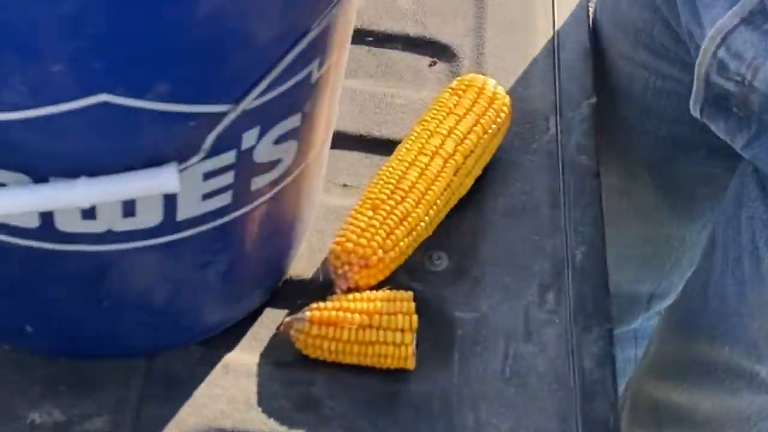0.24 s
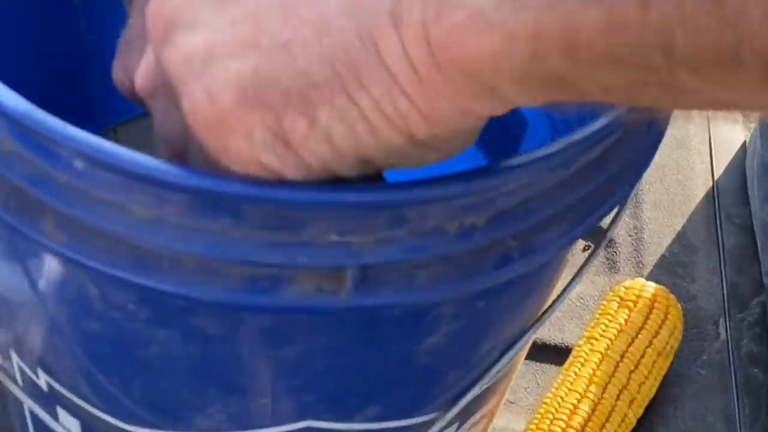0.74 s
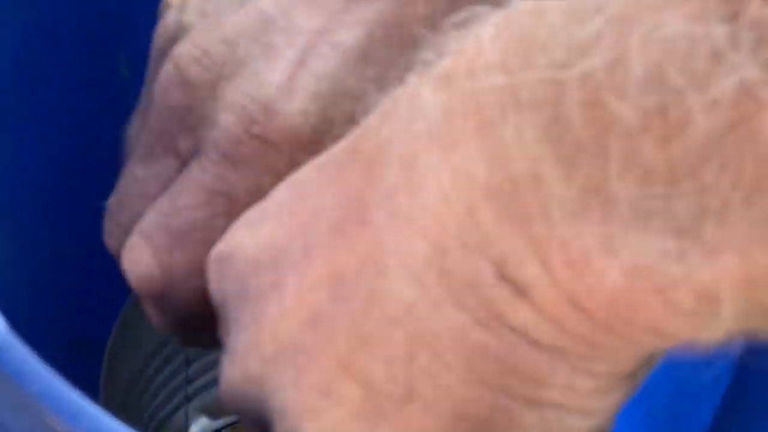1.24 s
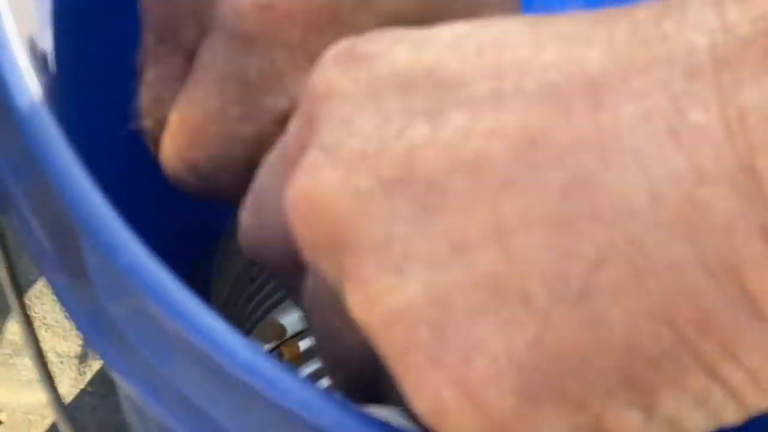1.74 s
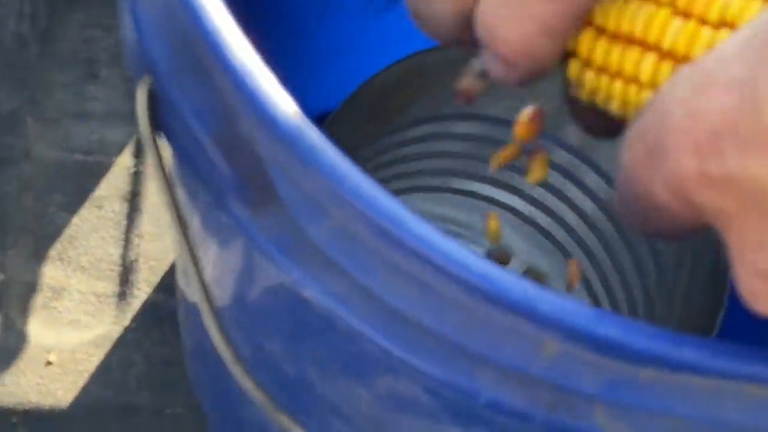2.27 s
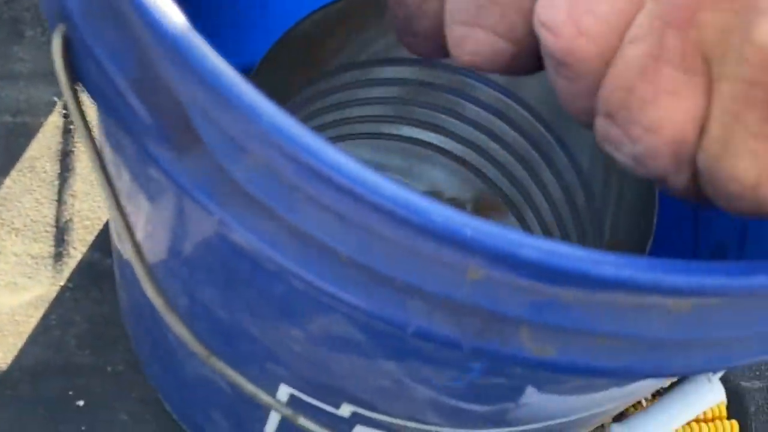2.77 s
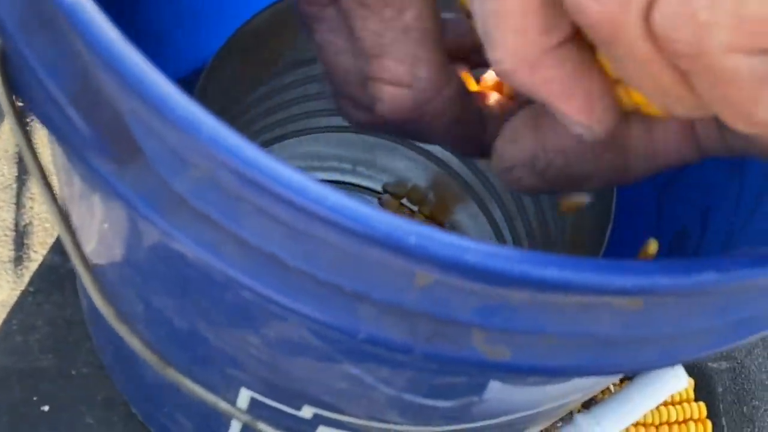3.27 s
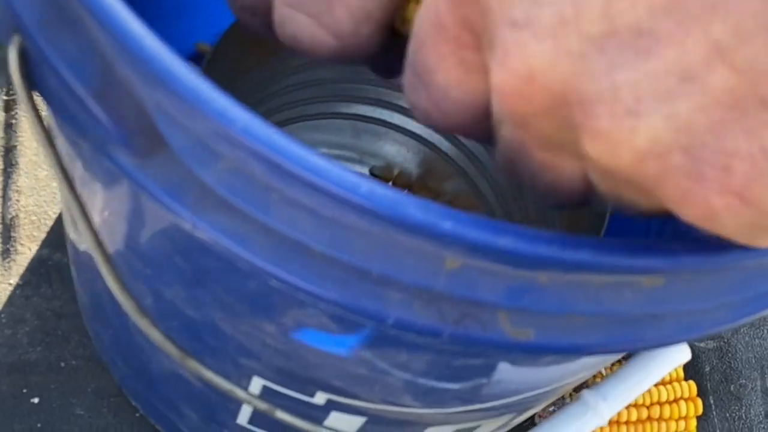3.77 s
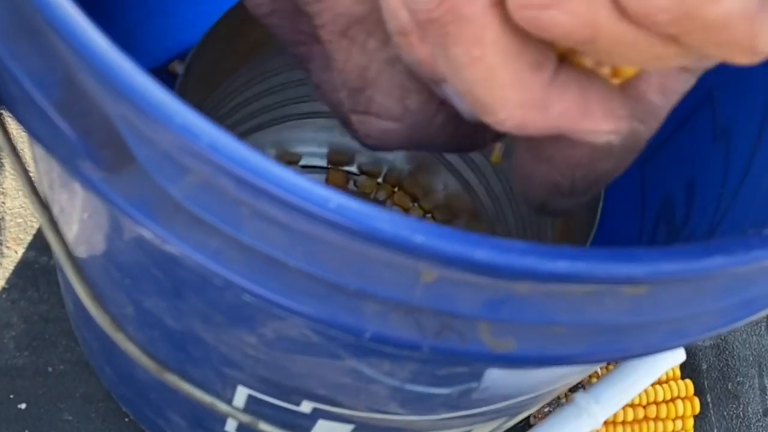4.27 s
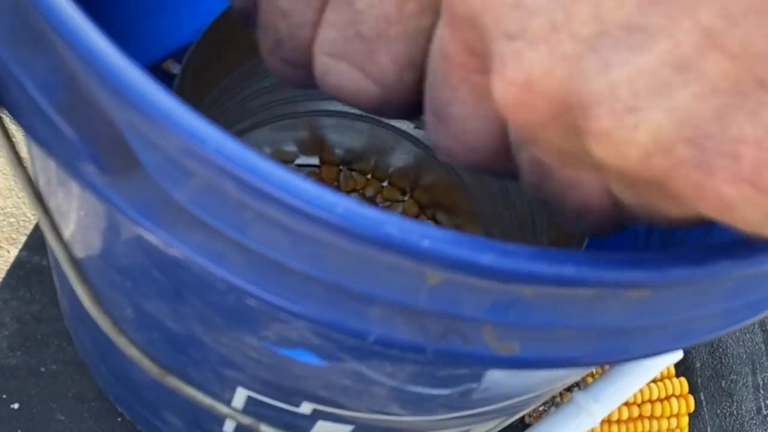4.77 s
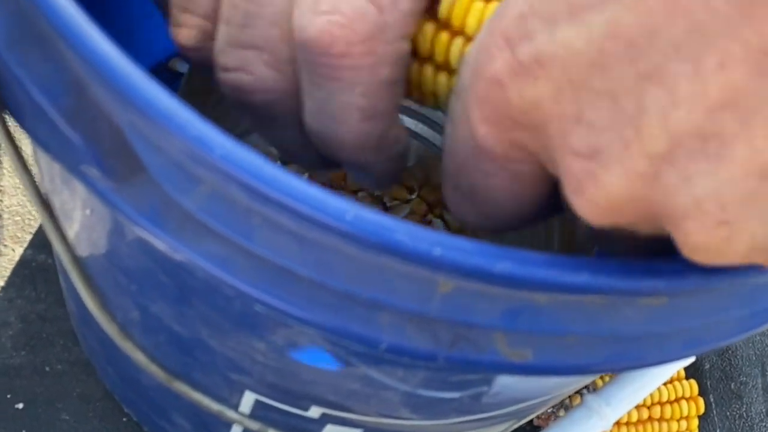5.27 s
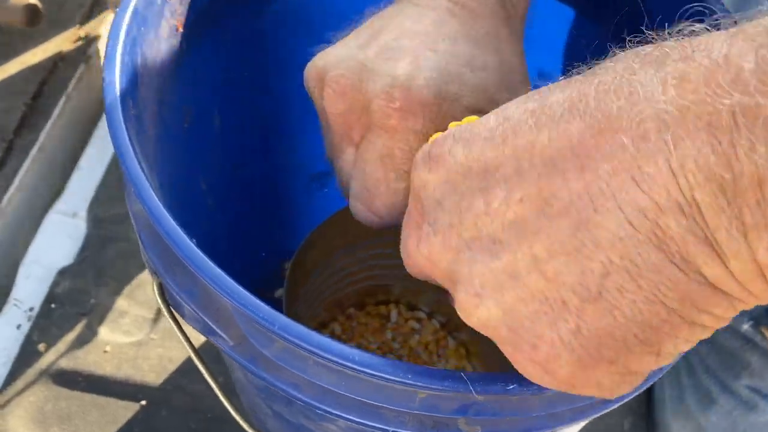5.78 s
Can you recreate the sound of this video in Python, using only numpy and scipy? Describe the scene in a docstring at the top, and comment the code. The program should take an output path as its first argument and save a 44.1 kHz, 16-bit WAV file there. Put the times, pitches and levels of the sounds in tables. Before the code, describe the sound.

Outdoors, hard kernels rattle and ping into a tin can in a plastic bucket, with faint bird whistles and a late, fading engine rumble.

```python
"""Corn kernels into a tin can

Dry kernels are twisted off a cob and clatter into a tin can in a plastic bucket outdoors: struck modes plus
streaked noise. The bucket booms (struck air and wall modes), hands rustle (grainy noise), a far bird whistles
(sliding sines). After a cut to a second view a nearby idling engine (throbbing noise, two tones) fades
while a few more kernels drop into the fuller can.
"""
import sys
import numpy as np
from scipy import signal
from scipy.fft import rfft, irfft, next_fast_len
from scipy.io import wavfile
from scipy.ndimage import uniform_filter1d, map_coordinates

SR = 44100
rng = np.random.default_rng(int(sys.argv[2]) if len(sys.argv) > 2 else 0)


def log_audio(samples):
    """Write samples as a 16-bit WAV file to the path given in sys.argv[1]."""
    # one column per channel
    frames = np.atleast_2d(samples).T
    # limit to full scale, then quantise
    limited = np.clip(frames, -1, 1)
    pcm = np.round(limited * 32767).astype(np.int16)
    wavfile.write(sys.argv[1], SR, pcm)


N = 265217
T = np.arange(N) / SR  # s
CUT_S = 5.388  # start of the second view

# Outdoor air spectrum: freq_hz, relative_db_per_hz
AIR_SPECTRUM = [(15, -31.5), (45, -3.5), (301, -13), (1200, -20), (2990, -28.5), (4030, -22.5),
                (7110, -35.5), (16000, -40.5)]
# Wind on the microphone ports: start_s, hold_s, level_db
PUFFS = [(0.0, .04, -42), (1, 0.056, -68), (5.3, .08, -74)]
# Engine noise spectrum: freq_hz, relative_db_per_hz
ENGINE_SPECTRUM = [(25, -16), (60, 10), (120, -4), (250, -13.5), (600, -17.5), (2000, -22), (5000, -22.5),
                   (9000, -29.5), (13000, -30), (16000, -29)]
# Engine tones: freq_hz, peak_db before wobble
ENGINE_TONES = [(140.0, -64), (479.1, -51.5)]
AIR_DB = -73.5
PUFF_RISE_DB_S, PUFF_FALL_DB_S = 310, 81
ENGINE_DB, ENGINE_FADE_DB_S = -37.5, 12

# Whistle arches: start_s, length_s, top_hz, top_position (share of length), relative_level_db
WHISTLES = [(.3, .21, 4500, .6, -76), (.53, .07, 4080, .5, -82), (.66, .16, 4230, .25, -79),
            (1.12, .17, 4330, .35, -81), (1.96, .06, 4100, .15, -72), (2.087, .053, 4250, .55, -60),
            (2.195, .05, 4410, .45, -68), (2.257, .06, 4280, .6, -66), (3.07, .13, 4270, .35, -79),
            (4.78, .08, 4550, .3, -82), (5.54, .035, 4250, .55, -53), (5.58, .045, 4060, .1, -56)]
START_DROP, END_DROP, BEND = 0.09, 0.17, 1.5  # depth below top (shares of top_hz), curve exponent
FULL_DEPTH_S = .16  # depth scales as sqrt(length / this)

# Hands and cob rubbing: start_s, hold_s, scrape_db, hiss_over_scrape_db
RUBS = [(0.0, 0.056, -29.5, -12), (.095, 0.042, -41, -8), (.22, 0.43, -66.5, -7.5), (.88, .19, -65, -7),
        (.925, .03, -64, 1), (.985, .01, -66, 3), (1.035, .006, -69, 2), (1.27, 0.11, -68.5, -2.5),
        (1.95, 0.14, -75, 3.5), (3.0, 0.021, -76, -4.5), (4.72, 0.081, -74.5, -14),
        (4.87, 0.047, -73.5, 8.5)]
# Hiss spectrum: freq_hz, relative_db_per_hz
HISS_SPECTRUM = [(300, -120), (1500, -26), (3000, 1.5), (6000, 0.5), (10000, -7), (14000, -4),
                 (16000, -19.5)]
# Scrape spectrum: freq_hz, relative_db_per_hz
SCRAPE_SPECTRUM = [(90, -21.5), (200, 9), (500, -1), (1500, 0), (2500, -10), (5000, -51.5)]
RUB_RISE_DB_S, RUB_FALL_DB_S = 712, 331.5

# Touches on the bucket: start_s, relative_level_db, knock_over_level_db
TOUCHES = [(0.003, -7.5, -1.5), (0.021, -20, 10), (0.058, -12, -3), (0.093, -31, 5), (0.218, -24, 5),
           (0.245, -25.5, 4.5), (0.271, -26.5, -1), (0.306, -26.5, -16), (0.365, -22.5, -5.5),
           (0.391, -38, 15.5), (1.003, -37.5, 0), (1.133, -51.5, 18.5), (1.397, -23.5, -24),
           (1.54, -32, 15), (1.626, -21.5, -3), (1.681, -38, 13), (1.737, -31.5, -6), (2.56, -34, 0),
           (3.268, -41, -21.5), (3.292, -36, -41.5), (3.436, -37.5, 12.5), (3.546, -40, 3), (3.745, -29, 1),
           (3.769, -34, 8), (3.79, -23, -3), (3.809, -32.5, -20), (4.221, -27, 0), (4.404, -49, 22.5),
           (4.569, -50.5, 23), (4.769, -37, -26.5), (4.788, -34.5, -20.5), (5.011, -50.5, 0),
           (5.114, -38.5, -3), (5.327, -31, 3), (5.86, -24.5, 10), (5.972, -32, -1)]
# Air and wall modes of the bucket: freq_hz, width_hz, relative_db
BUCKET_MODES = [(145, 17, -1), (175, 31, 5), (209.7, 19, 6), (300, 33, -4.5)]
# Wall knock spectrum: freq_hz, relative_db_per_hz
KNOCK_SPECTRUM = [(130, -45), (250, -7), (450, 5), (900, 1), (1350, -7), (1800, -30.5), (4000, -49)]
# Shoves that keep the bucket booming: start_s, hold_s, level_db before the push filter
SHOVES = [(0.0, 0.074, -27), (.3, 0.023, -34), (.95, 0.2, -58.5), (1.6, 0.061, -34.5), (2.5, 0.11, -46.5),
          (3.3, 0.26, -54), (3.8, 0.59, -50), (4.8, 0.42, -63.5)]
# Can rattling in the shoved bucket: start_s, hold_s, level_db
SHAKES = [(0, .11, -40)]
SHOVE_RISE_DB_S, SHOVE_FALL_DB_S = 290.5, 96
BOOM_DB, KNOCK_DB = -6.5, -13  # response to a touch

# Kernels on the can bottom: start_s, relative_level_db, body_over_level_db, gong_db, treble_over_level_db,
# best_low_mode_hz, best_high_mode_hz
KERNELS = [(1.34, -40, 1.5, -47.0, -7.5, 1030, 2645), (1.355, -11.5, -2.9, -38.0, -10.5, 1030, 4325),
           (1.375, 1.5, -3.5, -22.5, -4, 990, 2645), (1.385, -0.5, 4, -26, -13.5, 1680, 2645),
           (1.463, -9.5, 1.3, -41.5, -2, 1093, 4960), (1.48, -1, -4.5, -23.5, -7.5, 1760, 2645),
           (1.531, 3, 1, -49.5, -12.5, 1968, 2645), (1.566, -4, -3.5, -37.5, -13, 1093, 2645),
           (1.61, -7.5, 2.5, -29.5, -11, 990, 3680), (1.625, -6.5, -8.5, -50, -2.5, 1968, 4030),
           (1.659, -6, -4, -43, -1, 1760, 3680), (1.724, -12, -6, -42, -2.5, 785, 4325),
           (1.771, -28, 8.5, -65, 4.5, 1968, 2645), (1.805, -20.5, 1.5, -46, -2, 1968, 2645),
           (1.863, -35.0, 1.5, -82.5, -29.5, 656, 4325), (1.884, -29.5, 8.5, -77, -11.5, 1968, 2645),
           (2.382, -5, -12.5, -37, -13, 1968, 4325), (2.389, -12.5, -3.5, -35.0, -8.5, 1968, 4325),
           (2.441, 1.5, 1, -28.5, -6, 1030, 3680), (2.49, -3.5, 3, -18, -12, 1968, 4325),
           (2.563, -7, 5.5, -44.0, -4, 1680, 4325), (2.591, -12.5, -7, -37, -2.5, 990, 3680),
           (2.633, -11, -3.5, -52.5, 0.5, 1030, 5308), (2.719, -9, 0, -36, -4.5, 990, 4325),
           (2.812, -16, -1.5, -59, -10, 1760, 4960), (2.86, -38, -4.5, -73.5, 3, 990, 4181),
           (2.932, -31.5, -4.5, -71, -2, 1760, 4960), (2.959, -37.5, 1.5, -89, 4, 990, 6046),
           (3.365, -18.5, -28, -63, -1, 1968, 3229), (3.383, -2, -6, -31.5, -4.5, 2282, 4181),
           (3.425, -1, -1, -25, -8.0, 2282, 4181), (3.435, 1.0, 3, -38, -11.5, 2282, 3229),
           (3.48, -6.5, 3, -33.5, -8, 1968, 2645), (3.513, -10.5, 7.5, -59.0, 0, 990, 2645),
           (3.527, -5.5, 1.0, -39, -7.5, 2282, 4181), (3.55, -1, -2.5, -27, -9, 1030, 4325),
           (3.583, -3.5, 0, -50.0, -10, 1968, 4181), (3.693, -22.5, 8.5, -49, -5.0, 990, 6524),
           (3.714, -23, 17.5, -38, -14, 1680, 3229), (3.755, -13, -0.5, -40, -8, 990, 3680),
           (3.807, -14, 6, -75.5, -6.5, 1760, 4960), (3.869, -18.5, 8.5, -43, -9, 1680, 4181),
           (3.917, -20.5, 12, -41, -1, 1680, 5308), (3.93, -9, -2, -63.5, -7, 2282, 5308),
           (3.95, -25, 12, -63.5, -27, 1030, 4793), (3.984, -34.5, 1, -42, -8, 1968, 2645),
           (4.009, -12.5, 1.5, -45, -9, 1968, 3680), (4.023, -5.5, -1, -30, -8, 1680, 4181),
           (4.071, -7, -2.9, -57, -7, 2282, 4793), (4.124, -12.5, 0, -69, -13, 1680, 2645),
           (4.156, -10, -4.5, -54, -6.5, 1968, 4793), (4.201, -2, 5.5, -24, -4.5, 1680, 4793),
           (4.217, 0, 3, -26, -8.0, 1968, 3680), (4.259, -6.5, 6.5, -35, -1.5, 1030, 4181),
           (4.296, -7, 5, -26.5, -5.5, 1968, 6046), (4.393, -2.5, 2, -40, -9, 1093, 4181),
           (4.491, -21.5, 6, -53.5, -5.5, 990, 4793), (4.532, -21, 11.5, -50, 0, 2282, 3680),
           (4.564, -22.5, 15, -54.0, -16.5, 990, 4325), (4.62, -45, 16, -77.0, -17, 1680, 4181),
           (4.663, -31.5, -2.5, -89.5, 0, 1030, 6136), (4.693, -46, 5, -70.5, -19, 656, 5120),
           (4.996, -20.5, -2.5, -59, -11, 1030, 5308), (5.072, -21.5, -2, -46.0, -4.5, 2282, 4960),
           (5.085, -20, 3.5, -37, -4, 2282, 4793), (5.096, -16.5, -2.5, -57, -22, 1030, 4960),
           (5.133, -21.5, 5.0, -71.5, 0.5, 990, 4325), (5.31, -10.5, -7.5, -41, -13, 1760, 4325),
           (5.324, -5, -7, -32, -11.5, 1968, 4181), (5.348, -4.0, 2, -53.5, -1, 1760, 5308),
           (5.36, 2.5, -2, -29, -13.5, 1968, 4960), (5.517, -22, -17, -72.5, -13, 785, 4793),
           (5.558, -23, -10, -74.5, -19, 1680, 4793), (5.636, -29.5, -1, -86.0, -11, 1968, 3229),
           (5.857, -7.5, 2.5, -42.0, -9.5, 656, 6524), (5.913, -5.0, 4, -44.5, -22, 1680, 2645),
           (5.94, -17, 9, -37, -15, 785, 4325), (5.95, -3.5, -11, -71, -23.5, 1680, 5120),
           (5.967, -10.5, -1, -48.5, -14.5, 1093, 2645), (5.99, -16.5, -18, -71, -19, 1030, 4793)]
# Kernels glancing off the upper wall: start_s, relative_level_db, body_over_level_db, treble_over_level_db,
# t60_s, best_mode_hz
GLANCES = [(2.3115, -28, -32, -2.5, 0.16, 5350), (2.3303, -29.5, -26, 5.5, 0.058, 3800),
           (3.2382, -45.5, -4, -25.5, 0.2, 3800), (5.2215, -30.5, -19, 8, 0.14, 3150),
           (5.233, -17, -24.5, -7, 0.068, 5350), (5.2693, -18, -22, 0.5, 0.078, 3800),
           (5.815, 0, -7, -3.5, 0.071, 5300)]
# Twists that shed small bounces: start_s, hold_s, base_level_db
TWISTS = [(1.38, .2, -30.5), (2.4, 0.2, -28), (3.39, 0.25, -33.5), (3.68, 0.059, -37), (4.01, 0.14, -46),
          (4.2, .13, -24.5)]
# Clear modes of the can: freq_hz, width_hz, relative_db
CAN_MODES = [(656, 28, -11), (785, 40, -18), (990, 50, -6), (1030, 40, -5), (1093, 30, -9), (1680, 60, -3),
             (1760, 50, -6), (1968, 35, -4), (2282, 35, -7), (2645, 45, -1), (3229, 28, -8), (3680, 28, -6),
             (4030, 40, -8), (4181, 18, -6), (4325, 18, -6), (4793, 25, -7), (4960, 45, -3), (5120, 45, -7),
             (5308, 35, -8), (6046, 30, -6), (6136, 40, -3), (6524, 35, -5), (7100, 60, -7), (8000, 60, -6),
             (8840, 45, -6), (9183, 45, -7), (9910, 60, -7), (10475, 70, -5), (12110, 70, -4)]
# Clear modes of the upper wall: freq_hz, width_hz, relative_db
RIM_MODES = [(1660, 20, 8), (3150, 25, -15), (3800, 30, -2), (4980, 35, -10), (5350, 28, -1),
             (5700, 40, -9)]
# Clear modes of the fuller can under glances: freq_hz, width_hz, relative_db
FULL_CAN_MODES = [(2920, 25, -13), (3950, 22, -1), (5300, 35, -1), (5650, 30, -6), (7250, 60, -4),
                  (8300, 70, -4)]
# Strike noise spectrum: freq_hz, relative_db_per_hz
CRACK_SPECTRUM = [(300, -29), (900, -14.5), (2000, -11.5), (3000, -12.5), (6000, -8.5), (9000, 1.5),
                  (12500, 6.5), (14500, 1), (16000, -9.5)]
TWIST_RISE_DB_S, TWIST_FALL_DB_S = 609.5, 109.5
GONG_HZ = 1332  # drum-head mode of the can bottom
GONG_T60_S, GONG_T60_LOSS_S_PER_S = .36, .05  # kernels gather on the bottom
STRIKE_T60_S, STRIKE_T60_FULL_S = .14, 0.054  # mid-range, at level 0 dB; fuller can, any level
T60_S_PER_DB = .0018  # lighter strikes die sooner
FAVOUR_DB = 8  # strength of a blow's best modes
SKIRT_WIDTHS = 5  # spread of crowded modes round a clear one

# Microphone ports, first view: freq_hz, left_lead_turns
LEAD_EARLY = [(300, 0), (800, -.06), (1800, -.01), (3200, .13), (4500, .13), (5300, .03), (7200, .5),
              (10300, 1), (13500, 1.5), (16500, 2)]
# Microphone ports, second view: freq_hz, left_lead_turns
LEAD_LATE = [(300, 0), (2500, .09), (5500, 0), (7300, -.06), (8800, -.5), (11000, -1), (13300, -1.5),
             (15500, -2)]
# Port level balance: freq_hz, left_over_right_db
BALANCE = [(200, 0), (400, .6), (750, 4), (1400, 1.5), (2500, -1), (5000, -.6), (9000, 0)]
TOP_HZ = 16100


def amp(db):
    """Gain of a level in dB."""
    return 10 ** (np.asarray(db) / 20)


def unit(x):
    """x at rms 1."""
    return x / np.sqrt(np.mean(x ** 2) + 1e-20)


def along(points, hz):
    """Interpolate (freq_hz, value) points on a log frequency axis."""
    f, v = np.transpose(points)
    return np.interp(np.log(hz + 1), np.log(f + 1), v)


def curve(rows, rise_db_s, fall_db_s):
    """Level in dB of gestures (start_s, hold_s, level_db) that rise, hold, fall; the loudest counts."""
    levels_db = []
    for start_s, hold_s, db in rows:
        before_s = np.clip(start_s - T, 0, None)
        after_s = np.clip(T - start_s - hold_s, 0, None)
        levels_db.append(db - rise_db_s * before_s - fall_db_s * after_s)
    return np.max(levels_db, axis=0)


def wobble(rate_hz):
    """Smooth random curve, rate_hz knots a second."""
    return map_coordinates(rng.standard_normal(int(N * rate_hz / SR) + 4), [T * rate_hz])


def filtered(x, response):
    """x times a complex response of frequency."""
    m = next_fast_len(N + SR // 2)
    return irfft(rfft(x, m) * response(np.fft.rfftfreq(m, 1 / SR)), m)[..., :N]


def rush(spectrum, apart):
    """Shaped stereo noise at rms 1; apart scales the part that differs between sides."""
    mid, side = filtered(rng.standard_normal((2, N)), lambda hz: amp(along(spectrum, hz)))
    return unit(np.array([mid + apart * side, mid - apart * side]))


def streaked(noise, depth_db):
    """Crowded modes: narrow strips of the noise stand out for some tens of ms."""
    z = signal.stft(noise, nperseg=256)[2]
    field = uniform_filter1d(rng.standard_normal(z.shape[1:]), size=12, axis=1)
    return unit(signal.istft(z * amp(depth_db * unit(field)), nperseg=256)[1][:, :N])


def train(start_s, size):
    """Impulses at given times."""
    return np.bincount(np.clip((start_s * SR).astype(int), 0, N - 1), size, N)


def swell(start_s, size, rise_s, t60_s):
    """Envelope of bursts whose energies add: a rise, then each burst's own decay."""
    t = np.arange(int(.3 * SR)) / SR
    energy = np.zeros(N + len(t))
    for decay_s in np.unique(t60_s):
        shape = amp(-120 * t / np.clip(decay_s, .02, .3)) * (1 - np.exp(-t / rise_s)) ** 2
        shape = shape / shape.max()
        chosen = t60_s == decay_s
        for start, a in zip(start_s[chosen], size[chosen]):
            energy[int(start * SR):][:len(t)] += a ** 2 * shape
    return np.sqrt(energy[:N])


def ring(modes, start_s, size, spread_db, apart, lag_s, best_hz=()):
    """Blows of size(hz) start each mode at random strength, up to lag_s late; best modes are favoured."""
    out = np.zeros((2, N))
    for hz, width_hz, db in modes:
        r, w = np.exp(-np.pi * width_hz / SR), 2 * np.pi * hz / SR
        z = rng.standard_normal((len(start_s), 4))
        best = sum(np.exp(-(np.log(column / hz) / .012) ** 2) for column in best_hz)
        strength_db = (db + spread_db * z[:, 0]) * (1 - best) + FAVOUR_DB * best
        blow = size(hz) * amp(strength_db) * np.sign(z[:, 1])
        hit_s = start_s + lag_s * np.abs(np.tanh(z[:, 3]))
        pair = [train(hit_s, blow * (1 + side * apart * z[:, 2])) for side in (1, -1)]
        out += signal.lfilter([.5, 0, -.5], [1, -2 * r * np.cos(w), r * r], pair)
    return out


def calm_air():
    """Quiet, slowly wavering air noise."""
    return amp(AIR_DB + 1.3 * wobble(2)) * rush(AIR_SPECTRUM, apart=.25)


def wind_puffs():
    """Wind on the ports: unsteady bursts of low noise."""
    low = rush([(20, -15), (40, 0), (90, 0), (130, -25), (300, -90)], apart=.05)
    return amp(curve(PUFFS, PUFF_RISE_DB_S, PUFF_FALL_DB_S) + 2.5 * wobble(14)) * low


def engine():
    """Idling engine: fading, throbbing noise, bass alike on both sides, plus wobbling tones."""
    throb = amp(ENGINE_DB - ENGINE_FADE_DB_S * (T - CUT_S) + 1.2 * wobble(30))
    deep, wide = rush(ENGINE_SPECTRUM, apart=0.07), rush(ENGINE_SPECTRUM, apart=0.8)
    high = lambda hz: 1 / (1 + (600 / (hz + 1)) ** 4)
    body = deep + filtered(wide - deep, high)
    tones = sum(amp(db + 1.9 * wobble(64)) * np.sin(2 * np.pi * hz * T) for hz, db in ENGINE_TONES)
    return throb * body + tones


def outdoors():
    """Air and wind before the cut, engine after it."""
    return np.where(T < CUT_S, calm_air() + wind_puffs(), engine())


def bird():
    """Thin whistles sliding up to a top and down, with soft ends, slightly louder on the left."""
    out = np.zeros(N)
    flutter = amp(2.5 * wobble(45))
    for start_s, length_s, top_hz, top, db in WHISTLES:
        u = np.arange(int(length_s * SR)) / (length_s * SR)
        rising = START_DROP * np.clip(1 - u / top, 0, None) ** BEND
        falling = END_DROP * np.clip((u - top) / (1 - top), 0, None) ** BEND
        hz = top_hz * (1 - np.sqrt(length_s / FULL_DEPTH_S) * (rising + falling))
        whistle = np.sqrt(np.sin(np.pi * u)) * np.sin(2 * np.pi * np.cumsum(hz) / SR)
        out[int(start_s * SR):][:len(u)] += amp(db) * whistle
    return out * flutter * amp([[.6], [-.6]])  # left, right dB


def hands():
    """Skin on dry kernels and plastic: grainy, streaky hiss and a duller scrape."""
    grain = amp(2 * wobble(120) + 1 * wobble(35))
    hiss_rows = [(start_s, hold_s, db + over_db) for start_s, hold_s, db, over_db in RUBS]
    hiss_db = curve(hiss_rows, RUB_RISE_DB_S, RUB_FALL_DB_S)
    scrape_db = curve([row[:3] for row in RUBS], RUB_RISE_DB_S, RUB_FALL_DB_S)
    hiss = unit(grain * streaked(rush(HISS_SPECTRUM, apart=.15), depth_db=4))
    scrape = unit(grain * streaked(rush(SCRAPE_SPECTRUM, apart=0.41), depth_db=5.0))
    return amp(hiss_db) * hiss + amp(scrape_db) * scrape


def bucket():
    """Touches boom and knock the wall; shoves sustain the boom with uneven jolts and rattle the can."""
    start_s, db, knock_db = np.transpose(TOUCHES)
    boom = ring(BUCKET_MODES, start_s, lambda hz: amp(db + BOOM_DB), spread_db=1.5, apart=.03, lag_s=.009)
    knock = streaked(rush(KNOCK_SPECTRUM, apart=0.15), depth_db=4)
    knock_size = amp(db + knock_db + KNOCK_DB)
    knock = knock * swell(start_s, knock_size, rise_s=0.0036, t60_s=np.full(len(start_s), .07))
    jolts_s = rng.random(900) * N / SR
    drone = unit(ring(BUCKET_MODES, jolts_s, lambda hz: 1, spread_db=7.0, apart=.03, lag_s=.005))
    drone = amp(curve(SHOVES, SHOVE_RISE_DB_S, SHOVE_FALL_DB_S)) * drone
    tin = ring(CAN_MODES, jolts_s, lambda hz: 1, spread_db=8, apart=.2, lag_s=.01)
    tin = unit(filtered(tin, lambda hz: 1 / (1 + 1j * hz / 1800) ** 2))
    rattle = amp(curve(SHAKES, RUB_RISE_DB_S, RUB_FALL_DB_S)) * tin
    # flesh on plastic: a slow push
    push = lambda hz: (1j * hz / (90 + 1j * hz)) ** 2 / (1 + 1j * hz / 300) ** 2
    return filtered(boom + drone, push) + knock + rattle


def can(rows, modes, ring_db, crack_db, spread_db, rise_s, rough_db=0):
    """Skidding kernels ring clear modes; crowded modes sound as dying noise in three ranges."""
    start_s, db, body_db, treble_db, t60_s, *best_hz = np.transpose(rows)
    levels_db = [db + body_db, db, db + treble_db]
    size = lambda hz: amp(ring_db + levels_db[int(hz > 2450) + int(hz > 7500)])
    tones = ring(modes, start_s, size, spread_db, apart=.25, lag_s=3 * rise_s, best_hz=best_hz)
    tones = tones * amp(rough_db * wobble(250))  # skidding roughens the ring
    # a small can radiates no bass
    radiation = lambda hz: (1j * hz / (450 + 1j * hz)) ** 2 / (1 + 1j * hz / 14000) ** 2
    out = filtered(tones, radiation)

    noise = streaked(rush(CRACK_SPECTRUM, apart=.22), depth_db=5.5)
    near = lambda hz: np.sqrt(.12 + sum(amp(mode_db) / (1 + (2 * (hz - c) / (SKIRT_WIDTHS * w)) ** 2)
                                        for c, w, mode_db in modes))
    noise = unit(filtered(noise, near))
    below = [filtered(noise, lambda hz: 1 / (1 + (hz / edge_hz) ** 8)) for edge_hz in (2500, 7500)]
    ranges = [below[0], below[1] - below[0], noise - below[1]]
    lasting = (1.2, 1, .58)  # treble starts and dies first
    for part, level_db, k in zip(ranges, levels_db, lasting):
        out = out + part * swell(start_s, amp(level_db + crack_db), k * rise_s, k * t60_s)
    return out


def gong():
    """Kernels ring the drum-head mode of the bottom; blow energies add."""
    start_s, _, _, gong_db = np.transpose([row[:4] for row in KERNELS if row[0] < CUT_S])
    tone = np.sin(2 * np.pi * GONG_HZ * T + .6 * wobble(20))
    t60_s = GONG_T60_S - GONG_T60_LOSS_S_PER_S * start_s
    return tone * swell(start_s, amp(gong_db), rise_s=.002, t60_s=t60_s)


def stream():
    """Rows for can(): many small bounces of random time, size and colour."""
    z = rng.random((2400, 4))
    start_s = z[:, 0] * N / SR
    base_db = curve(TWISTS, TWIST_RISE_DB_S, TWIST_FALL_DB_S)
    db = base_db[(start_s * SR).astype(int)] + 9 * z[:, 1]
    body_db, treble_db = -.6 + 6 * (z[:, 2] - .5), -5.5 + 8 * (z[:, 3] - .5)
    rows = np.transpose([start_s, db, body_db, treble_db, np.full(len(start_s), .04)])
    return rows[db > -100]


def corn():
    """Single kernels, glances and the stream; the cut ends the first view at once."""
    small, glances = stream(), np.array(GLANCES)
    s, db, body_db, _, treble_db, low_hz, high_hz = np.transpose(KERNELS)
    t60_s = np.where(s < CUT_S, STRIKE_T60_S + T60_S_PER_DB * db, STRIKE_T60_FULL_S)
    big = np.transpose([s, db, body_db, treble_db, t60_s, low_hz, high_hz])
    first = glances[:, 0] < CUT_S
    early = can(big[s < CUT_S], CAN_MODES, ring_db=-25.5, crack_db=-11, spread_db=5.5, rise_s=.0022)
    early += gong()
    early += can(glances[first], RIM_MODES, ring_db=-19, crack_db=-9, spread_db=3, rise_s=.003, rough_db=4)
    early += can(small, CAN_MODES, ring_db=-14, crack_db=-4.0, spread_db=6.0, rise_s=0.0012)
    # a bed of kernels damps the bottom
    late = can(big[s > CUT_S], CAN_MODES, ring_db=-33.0, crack_db=-3.5, spread_db=5.0, rise_s=0.000465)
    late += can(glances[~first], FULL_CAN_MODES, ring_db=-19, crack_db=-7, spread_db=1.5, rise_s=.002,
                rough_db=3)
    return np.where(T < CUT_S, early, late)


def scene():
    """All sources together."""
    return outdoors() + bird() + hands() + bucket() + corn()


def ports(lead):
    """Response of the two ports: level balance and phase lead."""
    sides = np.array([[1], [-1]])
    gain = lambda hz: amp(sides * along(BALANCE, hz) / 2)
    turn = lambda hz: np.exp(1j * np.pi * sides * np.interp(hz, *np.transpose(lead)))
    return lambda hz: gain(hz) * turn(hz)


def record(dry):
    """Ports differ in timing and level; deepest bass and all above the band limit are lost."""
    both = np.where(T < CUT_S, filtered(dry, ports(LEAD_EARLY)), filtered(dry, ports(LEAD_LATE)))
    both = filtered(both, lambda hz: (1j * hz / (45 + 1j * hz)) ** 2)
    return filtered(both, lambda hz: 1 / (1 + (hz / TOP_HZ) ** 100))


dry = scene()
out = record(dry)
log_audio(out)
```